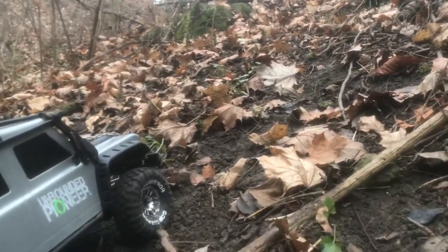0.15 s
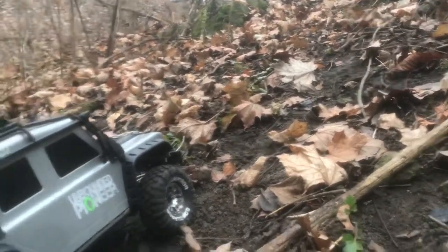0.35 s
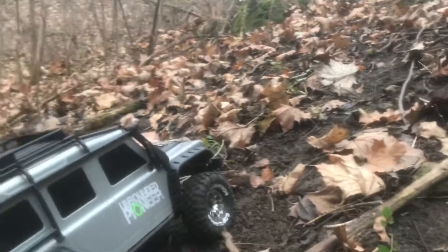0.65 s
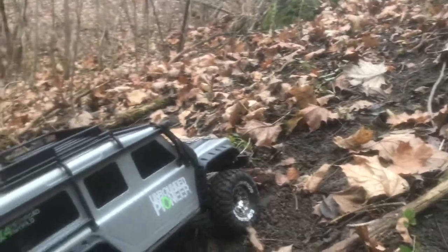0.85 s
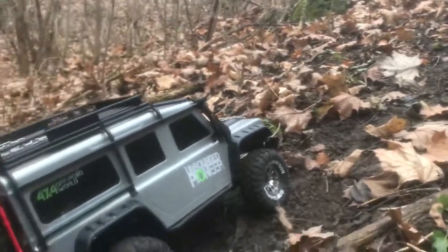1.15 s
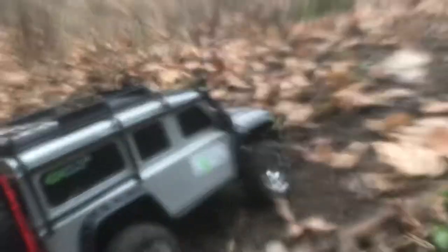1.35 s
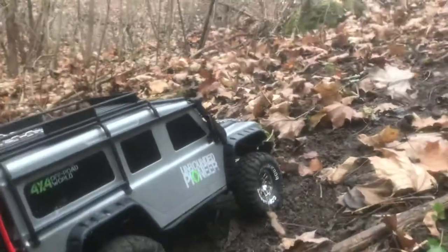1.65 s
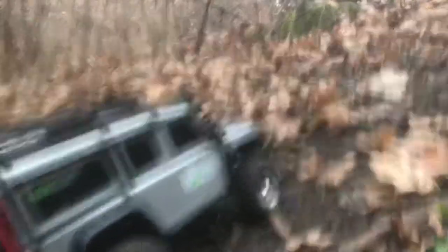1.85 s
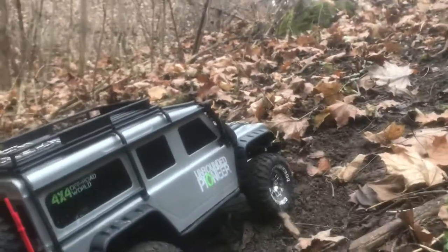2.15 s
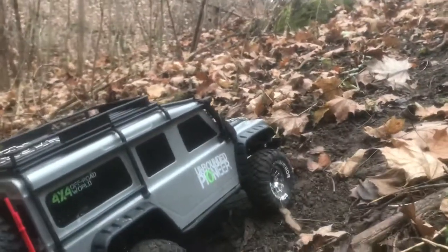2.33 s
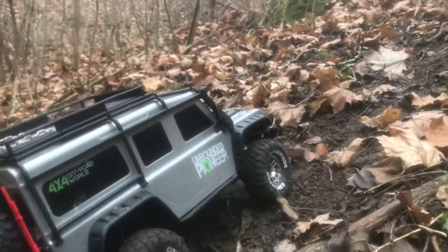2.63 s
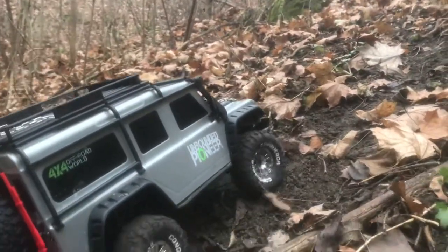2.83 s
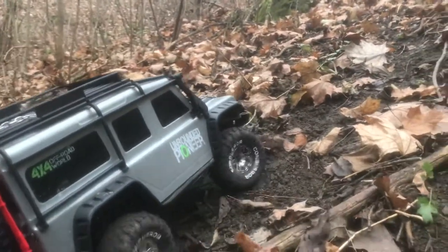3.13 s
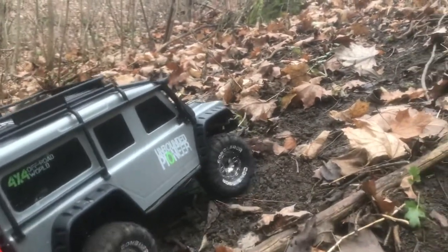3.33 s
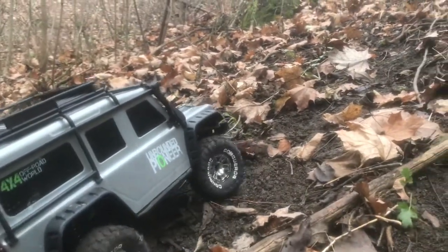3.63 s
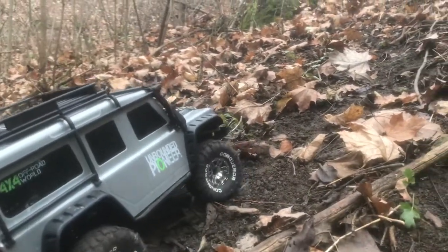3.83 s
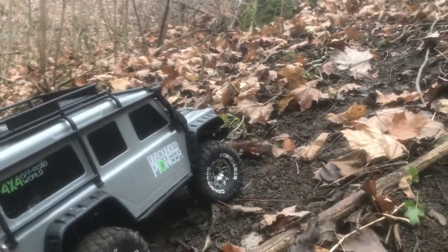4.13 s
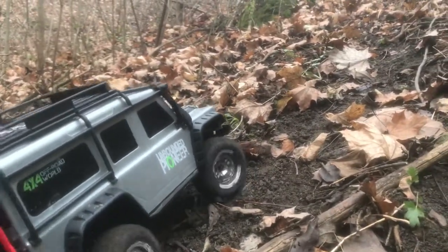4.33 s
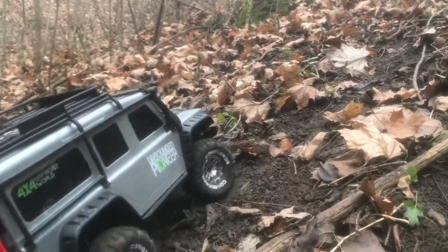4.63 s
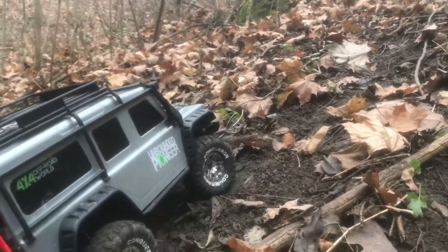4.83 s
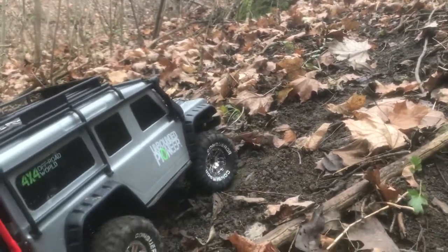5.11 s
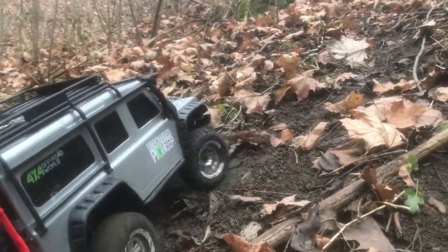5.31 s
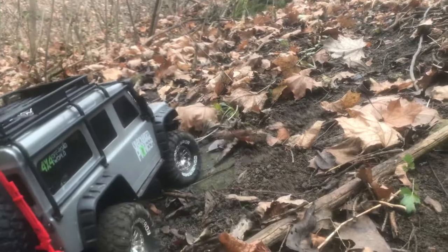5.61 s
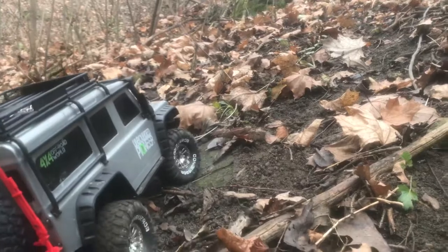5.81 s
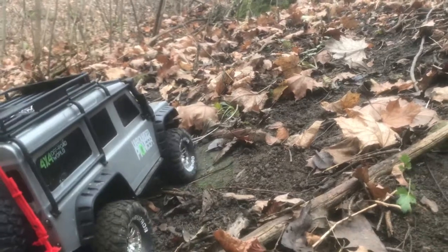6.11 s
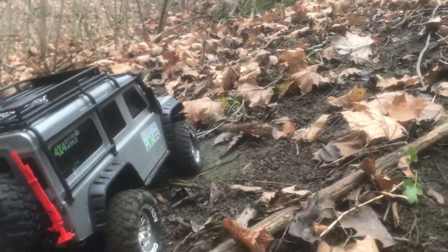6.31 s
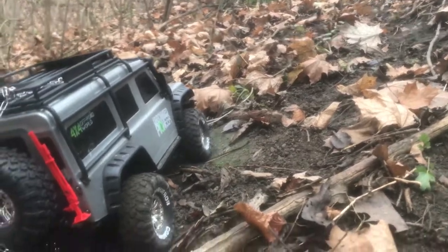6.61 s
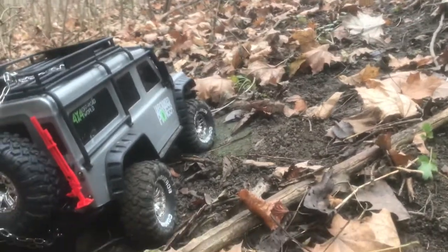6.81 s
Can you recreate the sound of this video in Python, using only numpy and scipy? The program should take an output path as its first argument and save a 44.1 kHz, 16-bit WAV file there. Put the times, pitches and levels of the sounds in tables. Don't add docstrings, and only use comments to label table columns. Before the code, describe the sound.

Close outdoor sound on a woodland floor, with faint low traffic far behind. From about 0.2 s a small electric model truck starts crawling: a low, rapid buzzing hum near 80 pulses a second, gears slapping and rattling in a plastic shell, hissy pinion whine, dry leaves crunching. At 1.32 s a twig snaps very loudly, with splinters and a dull thud; further knocks come around 1.8 to 1.9 s. A brief high servo whine sounds at 2.6 to 2.9 s as the tyres lose grip and scrabble unevenly, cracking stalks. The steady drive stops near 3.8 s. Short gritty wheel-spin bursts follow at 4.3 to 4.6 s and 5.2 to 5.5 s, with sharp cracks. A hard crack and woody knock land at 5.72 s, then a slowing servo whirr. The rest is quiet: small knocks, sparse ticks, and a rising-and-falling servo turn at 6.5 to 6.9 s.

```python
import sys
import numpy as np
from scipy import signal
from scipy.fft import rfft, irfft
from scipy.io import wavfile

SR = 44100
rng = np.random.default_rng(int(sys.argv[2]) if len(sys.argv) > 2 else 0)


def convert_level_to_amplitude(level_db):
    exponent = np.asarray(level_db, float) / 20
    return 10 ** exponent


def unload_audio(sound):
    columns = np.transpose(np.atleast_2d(sound))
    steps = np.round(np.clip(columns, -1, 1) * 32767)
    wavfile.write(sys.argv[1], SR, steps.astype(np.int16))


N = 306923
TIME_S = np.arange(N) / SR
CHOP_HZ = 78.9
GRIP_ENDS_S, CRAWL_ENDS_S = 2.76, 4.0
GRIPPING, CRAWLING = TIME_S < GRIP_ENDS_S, TIME_S < CRAWL_ENDS_S


def rms_one(x):
    return x / np.sqrt(np.mean(x ** 2) + 1e-20)


def in_time(rows, outside=None):
    s, *columns = np.transpose(rows)
    return [np.interp(TIME_S, s, c, left=outside, right=outside) for c in columns]


def drift(rate):
    r = np.exp(-40 * np.pi * rate / SR)
    noise = rng.standard_normal(N // 20 + 2002)
    slow = signal.lfilter([1], [1, -2 * r, r * r], noise)[2000:]
    return np.interp(np.arange(N) / 20, np.arange(len(slow)), rms_one(slow))


def colour(x, spectrum):
    hz, db = np.transpose(spectrum)
    grid = np.maximum(np.arange(8193) * SR / 16384, 1)
    log_gain = np.interp(np.log(grid), np.log(hz), db, left=-90, right=-90) * np.log(10) / 20
    cepstrum = irfft(log_gain)
    cepstrum[1:8192] *= 2
    cepstrum[8193:] = 0
    response = irfft(np.exp(rfft(cepstrum)))
    return rms_one(signal.fftconvolve(x, response)[:N])


def resonate(x, modes):
    out = 0
    for k, (hz, width, db) in enumerate(modes):
        r = np.exp(-np.pi * width / SR)
        a = [1, -2 * r * np.cos(2 * np.pi * hz / SR), r * r]
        b = np.array([1, 0, -1]) * (1 - r * r) / 2
        out = out + (-1) ** k * convert_level_to_amplitude(db) * signal.lfilter(b, a, x + 1e-18)
    return rms_one(out)


def grains(per_s, spread_db, bed):
    sizes = convert_level_to_amplitude(spread_db * np.minimum(rng.exponential(1, N), 4)) * rng.choice([-1, 1], N)
    clicks = sizes * (rng.random(N) < per_s / SR)
    return rms_one(clicks) + bed * rng.standard_normal(N)


def burst(noise, low_hz, high_hz, t60, rise_s=.00012):
    t = np.arange(len(noise)) / SR
    band = signal.butter(2, np.clip([low_hz, high_hz], 50, 17000), "band", fs=SR, output="sos")
    puff = signal.sosfilt(band, noise * convert_level_to_amplitude(-60 * t / t60) * (1 - np.exp(-t / rise_s)))
    return puff / np.abs(puff).max()


def add(out, s, sound):
    at = int(s * SR)
    out[at:at + len(sound)] += sound[:N - at]


def swells(rows, rise_db_per_s, fall_db_per_s):
    s, length, db = np.transpose(rows)[:, :, None]
    t = np.arange(0, N, 32) / SR
    early_s, late_s = np.maximum(s - t, 0), np.maximum(t - s - length, 0)
    shape_db = db - rise_db_per_s * early_s - fall_db_per_s * late_s
    return np.interp(TIME_S, t, np.sum(convert_level_to_amplitude(shape_db) ** 2, axis=0))


# (start t/s, length t/s, depth level/dB)
BASS_SAGS = [
    (1.435, 0.14, -21.5),
    (1.975, 0.08, -8),
]


def bass_sag():
    sag_db, edge_s = 0, .11
    for s, length, db in BASS_SAGS:
        inside_s = np.minimum(TIME_S - s, s + length - TIME_S)
        sag_db = sag_db + db * np.clip(inside_s / edge_s + 1, 0, 1)
    return convert_level_to_amplitude(sag_db)


# (f/Hz, level/dB per Hz)
RUMBLE_COLOUR = [(12, -62.5), (20, -49.5), (27, -35.5), (36, -11.5), (59, 3), (80, 3.5), (92, -10.5),
                 (129, -14), (191, -36.5), (220, -31), (290, -53), (480, -120)]
# (f/Hz, level/dB per Hz)
AIR = [(100, -30), (160, -8), (250, -17), (470, -23), (950, -15), (1500, -20), (2100, -33), (5000, -38),
       (13900, -43), (16400, -45)]


def woodland():
    rumble_gain = convert_level_to_amplitude(-45.5 - 0.13 * TIME_S) * bass_sag()
    rumble = rumble_gain * colour(rng.standard_normal(N), RUMBLE_COLOUR)
    air = convert_level_to_amplitude(-64.5 + drift(5.4)) * colour(rng.standard_normal(N), AIR)
    return rumble + air


# (t/s, gear tooth rate f/Hz, level/dB)
SERVO = [
    [(2.63, 1000, -68), (2.7, 1000, -60), (2.86, 1018, -59), (2.9, 1020, -67)],
    [(5.77, 704, -84), (5.8, 755, -67), (5.88, 600, -75), (5.93, 560, -79), (6.2, 500, -83),
     (6.3, 500, -92)],
    [(6.495, 480, -75), (6.52, 610, -67), (6.556, 786, -65), (6.586, 794, -63), (6.64, 730, -67),
     (6.695, 700, -65), (6.77, 590, -67), (6.9, 572, -79), (6.925, 535, -85)],
]
# (least noise share 0-1, lower case ring level/dB)
SERVO_MOVES = [
    (.78, -20),
    (.75, -3),
    (.5, -14),
]
# (t/s, f/Hz, level/dB)
SERVO_GLIDE = [(6.58, 5600, -84), (6.6, 5400, -73), (6.635, 4950, -72), (6.68, 4550, -74),
               (6.71, 4350, -86)]
# (f/Hz, width f/Hz, level/dB)
SERVO_CASE = [(12120, 260, 0), (11500, 500, -9), (12750, 450, -9), (14300, 500, -17)]
# (f/Hz, width f/Hz, level/dB)
SERVO_LOWER = [(9050, 340, -1), (9540, 470, -6), (5000, 800, -15.5)]


def servo():
    out, noise, wobble = 0, rng.standard_normal(N), drift(40.0)
    unsteady = 1 + .004 * wobble
    tooth_hz = in_time(sum(SERVO, []))[0]
    teeth = (2 * np.pi * (np.cumsum(tooth_hz * unsteady) / SR % 1)).astype(np.float32)
    ticks = rms_one(sum(np.cos(k * teeth) * (k * tooth_hz < 16000) for k in range(5, 30)))
    blurred_hz, clear_hz = 500, 900
    for rows, (least, lower_db) in zip(SERVO, SERVO_MOVES):
        level_db = in_time(rows, outside=-140)[1]
        share = np.clip((clear_hz - tooth_hz) / (clear_hz - blurred_hz), least, .95) ** 1.5
        drive = (1 - share) * ticks + share * noise
        ring = resonate(drive, SERVO_CASE) + convert_level_to_amplitude(lower_db) * resonate(drive, SERVO_LOWER)
        out = out + convert_level_to_amplitude(level_db + 4.0) * ring
    glide_hz, glide_db = in_time(SERVO_GLIDE, outside=-140)
    whistle = np.sin(2 * np.pi * np.cumsum(glide_hz * unsteady) / SR)
    return out + convert_level_to_amplitude(glide_db + 3 * wobble) * whistle


# (t/s, peak level/dB, f/Hz, t60 t/s)
THUDS = [(1.3215, -4.5, 594, 0.015), (1.3228, -28.5, 1392, 0.078), (1.321, -33, 1095, 0.059),
         (1.3207, -20, 1625, 0.017), (1.324, -32, 3000, .015), (1.327, -39, 1495, .035),
         (1.8291, -13, 717, 0.016), (1.9308, -14.5, 740, 0.011), (1.3234, -5.5, 298, 0.012),
         (1.324, -6, 215, 0.016), (1.3544, -6.5, 630, 0.0045), (1.83, -29, 330, 0.025),
         (1.835, -29, 170, 0.032), (6.478, -46, 2100, 0.029), (3.4, -36.5, 137, .15),
         (3.529, -34, 140, .12), (4.139, -39.5, 246, 0.092), (6.49, -39, 3240, 0.026),
         (6.49, -40, 93, 0.072), (1.356, -17, 196, 0.03), (5.722, -39, 792, 0.12), (5.757, -43, 167, 0.11),
         (5.668, -46, 490, 0.044), (5.928, -47, 453, 0.049), (6.659, -38, 145, 0.047),
         (6.661, -44.5, 455, 0.068)]


def thuds():
    out, t = np.zeros(N), np.arange(4000) / SR
    onset = 1 - np.exp(-t / 0.00052)
    for s, db, hz, t60 in THUDS:
        add(out, s, -convert_level_to_amplitude(db - 60 * t / t60) * np.sin(2 * np.pi * hz * t) * onset)
    return out


# (t/s, peak level/dB, centre f/Hz, ring t60 t/s)
KNOCKS = [(0.204, -37, 720, 0.044), (1.172, -44, 690, 0.032), (1.223, -51, 700, 0.025),
          (1.503, -35, 700, 0.02), (1.829, -25.5, 1260, 0.017), (3.642, -58, 800, .02),
          (1.832, -25, 750, 0.034), (1.881, -33, 900, 0.034), (1.933, -26, 690, 0.041),
          (2.736, -31.5, 2020, 0.021), (2.879, -28.5, 500, 0.022), (3.059, -32, 880, 0.024),
          (3.366, -32, 610, 0.059), (3.609, -26, 517, 0.043), (3.714, -28.5, 705, 0.024),
          (4.142, -39.5, 1500, 0.019), (4.284, -31, 1010, 0.033), (4.738, -41.5, 1140, 0.031),
          (4.995, -45, 1830, 0.024), (5.098, -32, 1440, 0.04), (5.188, -38, 794, 0.031),
          (5.47, -24.5, 2370, 0.03), (5.722, -22, 1546, 0.038), (5.729, -23.5, 1706, 0.062),
          (5.744, -27.5, 1400, 0.066), (5.733, -29.5, 1010, 0.065), (5.752, -28.5, 2390, 0.024),
          (5.834, -43.5, 1447, 0.12), (6.021, -39, 1085, 0.044), (6.493, -38.5, 1028, 0.063),
          (6.659, -32, 1370, 0.036), (6.689, -49, 1710, .025), (6.766, -49, 1500, .025),
          (6.914, -52, 1510, 0.026), (6.55, -50, 700, 0.025)]


def knocks():
    out, noise, t = np.zeros(N), rng.standard_normal((len(KNOCKS), 3000)), np.arange(3000) / SR
    for (s, db, hz, t60), a in zip(KNOCKS, noise):
        ring = 0.54 * np.sin(2 * np.pi * hz * t) * convert_level_to_amplitude(-60 * t / t60)
        sound = burst(a, hz / 2.26, hz * 1.88, t60) + ring
        add(out, s, convert_level_to_amplitude(db - 1.0) * sound / np.abs(sound).max())
    return out


# (t/s, peak level/dB, centre f/Hz, bright part level/dB)
CRACKS = [(1.3208, -16, 8640, 8), (1.3662, -28, 2650, -6), (1.8295, -31, 2440, 11), (1.8315, -28, 3440, -3),
          (1.9303, -32, 1920, 5), (1.831, -26, 6300, -6), (2.825, -15, 5300, 23), (3.1688, -21, 2680, 26),
          (3.391, -23.5, 2560, 17), (3.6026, -20.5, 4050, 7.5), (3.6197, -21.5, 5600, 5),
          (3.716, -23.5, 4000, 1), (3.714, -26, 1700, 7), (4.3112, -26, 2670, -1), (4.3203, -17.5, 3800, 7),
          (4.3394, -20, 3070, 13), (4.4432, -14, 4400, 6), (4.4583, -14, 5760, 18),
          (5.0769, -28.5, 2860, 12), (5.1007, -32, 2880, -10), (5.1194, -29, 4050, 20),
          (5.2101, -22, 4200, 7), (5.3444, -15, 3860, 14), (5.7208, -15, 8360, 11),
          (5.7308, -12.5, 2680, 17), (6.02, -41, 2560, 20), (6.4894, -28.5, 2350, 12),
          (6.6588, -48, 2480, 10)]
# (t/s, peak level/dB, centre f/Hz)
TICKS = [(0.204, -31, 2860), (1.641, -29, 3970), (1.954, -30.5, 5700), (2.166, -33, 8950),
         (2.283, -27, 7940), (2.878, -25, 3600), (3.034, -21, 5600), (3.098, -27.5, 2700),
         (3.452, -27, 3930), (3.8304, -40, 5400), (4.1438, -46, 2660), (4.2857, -29, 2620),
         (4.4218, -24, 4110), (4.469, -22.5, 4600), (4.555, -19.5, 4040), (4.59, -34, 2680),
         (4.663, -37, 3180), (4.7396, -46, 4220), (5.0603, -44, 4060), (5.143, -46, 4400),
         (5.513, -37, 2500), (0.743, -33, 11500), (1.075, -38, 9000), (2.52, -25.5, 4000),
         (2.405, -31, 4600), (2.765, -34, 3900), (5.189, -44, 4150), (5.471, -33, 2520), (5.525, -25, 4250),
         (5.5615, -30, 5700), (5.5817, -26.5, 6000), (5.6582, -39.5, 6540), (5.745, -26, 2560),
         (5.7534, -33, 2520), (5.836, -37.5, 3370), (6.122, -42, 4250), (6.8586, -46, 9640),
         (6.867, -47, 4100), (6.399, -59, 5000), (6.503, -50, 4600), (6.552, -54, 4750), (6.689, -49, 5600),
         (6.797, -54, 4500), (2.993, -36, 2610), (3.017, -28, 3740), (3.4254, -32, 4320),
         (3.46, -33.5, 1810), (3.515, -30, 4060), (3.545, -34, 2660), (3.5818, -31, 3590),
         (3.609, -25.5, 2720), (3.6537, -30, 3940), (3.665, -34, 2050), (4.328, -28, 2900),
         (4.366, -33, 5870), (5.239, -23.5, 2620), (5.2572, -24, 2570), (5.291, -33, 2940),
         (5.3105, -29, 4000), (5.335, -27, 5500), (5.372, -27, 2680), (5.3993, -31, 2860),
         (5.4173, -34, 4300), (5.749, -32, 6000), (6.064, -56, 2400), (6.108, -44.5, 2450),
         (6.365, -58, 9200)]


def cracks():
    breaks = CRACKS + [(*row, 6) for row in TICKS]
    out, noise = np.zeros(N), rng.standard_normal((len(breaks), 2, 1500))
    rise_s = .0005
    for (s, db, hz, bright_db), (a, b) in zip(breaks, noise):
        t60 = .0042 * convert_level_to_amplitude(-.3 * db)
        rip = convert_level_to_amplitude(bright_db - 4.0) * burst(a, 2200, 16000, t60, rise_s)
        sound = rip + burst(b, hz / 1.13, hz * 1.13, 1.9 * t60, rise_s)
        add(out, s + .0004, convert_level_to_amplitude(db - 6.0) * sound / np.abs(sound).max())
    return out


# (t/s, peak level/dB, top ring level/dB)
SNAPS = [
    (1.3233, -4, -4),
    (1.3332, -12, -2.5),
    (1.3566, -9.5, -10),
    (1.3662, -21, -13),
]
# (f/Hz, width f/Hz, level/dB)
SNAP_RING = [(3000, 500, -7), (4200, 940, -3.5), (6140, 1500, 1), (8460, 1600, -4)]


def snaps():
    out, noise, t = np.zeros(N), rng.standard_normal((len(SNAPS), 600)), np.arange(600) / SR
    for (s, db, top_db), a in zip(SNAPS, noise):
        step = (t == 0) + convert_level_to_amplitude(-18 - 60 * t / .004) * a
        sound = resonate(step, SNAP_RING + [(12900, 2000, top_db)])
        add(out, s, convert_level_to_amplitude(db) * sound / np.abs(sound).max())
    return out


# (t/s, torque hum level/dB, pinion mesh level/dB)
HUM = [(0.05, -54, -83), (0.17, -54.5, -60), (0.23, -47, -54.5), (0.36, -47, -48), (0.46, -46, -50),
       (0.57, -47.5, -52), (0.63, -46.5, -53), (0.85, -48.5, -53), (1.35, -45.5, -64), (1.43, -48.5, -69),
       (2.0, -50.5, -53), (2.36, -44, -70), (2.72, -48.5, -59), (2.8, -55, -65), (3.0, -52.5, -65),
       (3.58, -50.5, -59), (3.74, -47, -62), (3.8, -67, -86)]
# (multiple, level/dB under the third)
HUM_ORDERS = [(2, -22.5), (2.5, -25), (3.5, -15.5), (4, -26.5), (5, -8.5), (5.5, -12.5), (6, -16), (7, -14),
              (8, -12), (9, -25.5), (10, -17.5), (11, -22), (13, -22.5), (14, -22), (15, -35), (17, -27.5),
              (19, -17.5)]


def motor_hum(turn):
    third_db = in_time(HUM, outside=-140)[0]
    first = convert_level_to_amplitude(-40.5 + 0.54 * (third_db + 44.0)) * bass_sag()
    stutter_db = 5 * drift(14.0) * (TIME_S > GRIP_ENDS_S)
    sway = [drift(1.7) for _ in range(4)]
    wavering = 0
    for j, (k, db) in enumerate(HUM_ORDERS):
        wavering = wavering + convert_level_to_amplitude(db + 1.4 * sway[j % 4]) * np.cos(k * turn)
    upper = convert_level_to_amplitude(third_db + 1.2 + stutter_db) * (np.cos(3 * turn) + wavering)
    return -np.sqrt(2) * (first * np.cos(turn) + upper)


# (t/s, growl level/dB)
LOAD = [(0.0, -45), (0.07, -53.5), (0.16, -51), (0.22, -47), (1.45, -44.5), (2.5, -43), (2.72, -42),
        (2.8, -46), (3.05, -42.5), (3.27, -44), (3.735, -43), (3.8, -60.5), (3.97, -67.5), (4.64, -56.5),
        (5.04, -74.5), (5.7, -58), (6.3, -64.5), (6.96, -67)]
# (start t/s, length t/s, growl level/dB)
SLIPS = [(4.18, 0.08, -45), (4.26, 0.036, -44), (4.3, 0.058, -32.5), (4.4, 0.047, -33), (4.52, 0.026, -54),
         (4.555, 0.045, -39), (5.13, .05, -48), (5.19, .015, -45.5), (5.215, 0.14, -33.5),
         (5.37, 0.15, -38.5), (5.735, 0.02, -69)]
# (start t/s, length t/s, growl level/dB)
JERKS = [
    (4.103, .07, -56),
    (5.06, 0.057, -45.5),
]
# (start t/s, length t/s, crunch level/dB)
BITES = [(.23, 0.074, -62), (.33, 0.082, -53), (.44, 0.11, -67), (.495, .008, -57), (.605, 0.058, -58),
         (.7, 0.17, -57), (.92, 0.14, -64), (1.065, 0.041, -53), (1.17, .06, -73), (1.25, 0.37, -60),
         (2.2, 0.079, -53.5), (2.32, 0.15, -53.5), (2.53, 0.18, -53.5), (2.885, 0.011, -48.5),
         (3.03, 0.03, -55), (3.09, .03, -56), (3.14, 0.0086, -51.5), (3.21, 0.034, -62),
         (3.36, 0.23, -58.5), (3.79, 0.1, -66), (4.06, 0.019, -76), (4.34, 0.0083, -45.5),
         (4.425, 0.01, -48.5), (4.555, 0.0067, -53.5), (4.7, 0.063, -68.5), (5.2, 0.068, -54),
         (5.43, 0.026, -53.5), (5.52, 0.064, -60), (5.725, 0.0047, -55), (5.84, 0.059, -73),
         (5.96, 0.25, -72.5), (6.5, 0.2, -69.5), (6.76, .04, -72)]


def wheel_work():
    load_db = in_time(LOAD)[0]
    slips = swells(SLIPS, 406, 297.5) + swells(JERKS, 3000, 297.5)
    bites = swells(BITES, 309, 213)
    growl = convert_level_to_amplitude(load_db) ** 2 + slips
    slack_db = np.minimum(60.0 * (TIME_S - .2), 0)
    rattle = convert_level_to_amplitude(load_db + slack_db - 11) ** 2 + convert_level_to_amplitude(-10) ** 2 * slips + convert_level_to_amplitude(3) ** 2 * bites
    crunch = convert_level_to_amplitude(-68 + 0.65 * (load_db + 50.0)) ** 2 + convert_level_to_amplitude(-17) ** 2 * slips + bites
    return np.sqrt([growl, rattle, crunch])


# (t/s, share 0-1)
SLACK = [(.2, .75), (.5, .6), (.7, .95), (.9, .85), (1.1, .45), (2.2, .5), (2.5, .35), (2.76, .5)]


def gear_slap(turn):
    depth = np.where(GRIPPING, 0.86 * in_time(SLACK)[0], 0.35)
    depth = np.clip(depth, 0, 1) * (TIME_S < HUM[-1][0])
    pulse = .5 + .5 * np.cos(turn - .3 + .25 * drift(20.0))
    pulse = pulse * convert_level_to_amplitude(1.3 * drift(40.0)) * (1 + .45 * np.cos(3 * turn))
    return 1 - depth + depth * 3.33 * pulse


def ahead(slap, share):
    return np.roll(slap, -int(share * SR / CHOP_HZ))


def housing_knock(turn):
    cycles = turn / (2 * np.pi) - .29 + .015 * drift(30.0)
    sizes_db = 1.2 * rng.standard_normal(600)
    return rms_one(convert_level_to_amplitude(sizes_db[cycles.astype(int) % 600] - 26 * (cycles % 1)))


# (f/Hz, width f/Hz, level/dB)
FLOOR_RING = [(1120, 350, 1), (1500, 300, 2), (2140, 240, -8), (2660, 300, -2)]
# (t/s, level/dB over the growl)
FLOOR_KNOCK = [(.2, -13), (1.2, -14), (2.0, -12), (2.15, -9), (2.55, -9), (2.76, -12)]


def shell_floor(knock):
    tap = rms_one(np.maximum(np.diff(knock, prepend=0), 0))
    floor = resonate(rng.standard_normal(N) * knock + .9 * tap, FLOOR_RING)
    return convert_level_to_amplitude(in_time(FLOOR_KNOCK)[0]) * GRIPPING * floor


# (f/Hz, level/dB per Hz)
GROWL = [(55, -4), (90, -2.5), (175, -15), (260, -6.5), (400, -8.5), (640, -10.5), (720, -17),
         (1100, -27.5), (2000, -46)]
# (f/Hz, level/dB per Hz)
GROWL_UPPER = [(500, -23), (800, 0), (1500, -5.5), (2500, -9), (3300, -12), (4500, -30)]
# (f/Hz, level/dB per Hz)
GRIND = [(53, -9), (90, 4), (124, -3), (166, -7), (328, -3), (526, -9), (1160, -10.5), (1650, -19.5),
         (1950, -21), (2500, -42), (3250, -25), (5500, -120)]


def growl(lumps, slap, knocked):
    rasp = np.where(GRIPPING, rng.standard_normal(N) * knocked, rms_one(lumps))
    loaded = colour(lumps * slap ** .3, GROWL) + convert_level_to_amplitude(-10) * colour(rasp, GROWL_UPPER)
    return np.where(CRAWLING, loaded, colour(lumps, GRIND))


# (f/Hz, width f/Hz, level/dB)
SHELL = [(1526, 52, 5), (2100, 100, 2), (2680, 460, 4), (3980, 800, 6), (4520, 370, -0.5), (5600, 330, -26),
         (7150, 690, -6.5)]


def gear_rattle(clumps, slap, knocked):
    chatter = grains(6000, 4.0, bed=0.85) * convert_level_to_amplitude(2.5 * clumps)
    low = resonate(chatter * knocked, SHELL[:3])
    high = resonate(chatter * ahead(slap, .2) ** 1.55, SHELL[3:])
    buzz = rms_one(convert_level_to_amplitude(-6.0) * low + high)
    pings = 0
    for hz, width, db in SHELL:
        pings = pings + convert_level_to_amplitude(db) * resonate(grains(70, 5.5, bed=0.075), [(hz, 0.6 * width, 0)])
    return buzz + np.where(CRAWLING, .15, .9) * rms_one(pings)


# (f/Hz, width f/Hz, level/dB)
PINION = [(3850, 330, 2), (4250, 250, -2.5), (5600, 210, 3.5), (4960, 590, -13.5), (8920, 200, -9),
          (12000, 360, -8)]


def pinion_whine(turn, slap):
    wobbling = (TIME_S > 2.15) * GRIPPING
    wobble_db = 3.5 * np.cos(turn / 3 + 1.4) * wobbling
    mesh = rng.standard_normal(N) * ahead(slap, .12) ** 1.33 * convert_level_to_amplitude(wobble_db)
    whine_db = in_time(HUM, outside=-120)[1]
    return convert_level_to_amplitude(whine_db - 7.1) * resonate(mesh, PINION)


# (f/Hz, level/dB per Hz)
CLACK = [(1500, -34), (4000, -10), (5700, -4), (7500, -12.5), (8800, -2.5), (10400, -25), (11800, -3),
         (15700, -20.5)]


def backlash(turn):
    cycles = turn / (2 * np.pi) + .25 + .13 * drift(1.2) + .03 * drift(30.0)
    sizes_db = 3 * rng.standard_normal(600)
    ticks = convert_level_to_amplitude(sizes_db[cycles.astype(int) % 600] - 24 * (cycles % 1)) * rng.standard_normal(N)
    return convert_level_to_amplitude(-5) * colour(ticks, CLACK)


# (f/Hz, level/dB per Hz)
CRUNCH = [(1060, -4), (1800, -3.5), (1950, -13.5), (2630, -3.5), (3390, -6), (4260, -4.5), (4920, -7),
          (5900, -3.5), (7600, -13), (8330, -6.5), (10300, -12.5), (12500, -7.5), (15700, -15)]


def leaf_crunch(turn, clumps, slap):
    patches = convert_level_to_amplitude(2.2 * drift(25.0))
    litter = grains(3000 * convert_level_to_amplitude(2.5 * clumps), 3.3, bed=.8)
    leaves = colour(litter * patches * slap ** .35, CRUNCH)
    gripped = convert_level_to_amplitude(-5.5) * leaves + convert_level_to_amplitude(-2.5) * in_time(SLACK)[0] * backlash(turn)
    return np.where(GRIPPING, gripped, leaves)


def wheels(turn):
    growl_gain, rattle_gain, crunch_gain = wheel_work()
    slap = gear_slap(turn)
    clumps = drift(60.0) * np.where(GRIPPING, .25, np.where(CRAWLING, .6, .9))
    lumps = grains(400 * convert_level_to_amplitude(2.7 * clumps), 2.6, bed=1.0) * convert_level_to_amplitude(1.27 * drift(11.0))
    knock = housing_knock(turn)
    knocked = np.where(GRIPPING, .22 + knock, 1)
    low = growl_gain * (growl(lumps, slap, knocked) + shell_floor(knock))
    rattle = convert_level_to_amplitude(-3.5) * rattle_gain * gear_rattle(clumps, slap, knocked)
    crunch = convert_level_to_amplitude(5.5) * crunch_gain * leaf_crunch(turn, clumps, slap)
    return low + rattle + pinion_whine(turn, slap) + crunch


def scene():
    turn = 2 * np.pi * np.cumsum(CHOP_HZ * (1 + 0.00183 * drift(1.84))) / SR
    scrabbling = np.clip(8 * (TIME_S - GRIP_ENDS_S), 0, 1)
    turn = turn + .55 * scrabbling * drift(7.0)
    background = woodland() + servo()
    twigs = thuds() + knocks() + cracks() + snaps()
    return (background + twigs + motor_hum(turn) + wheels(turn))[None]


def band_limit(x):
    return signal.sosfilt(signal.butter(12, 17080, fs=SR, output="sos"), x)


def record(dry):
    bass_cut = signal.sosfilt(signal.butter(3, 38.0, "high", fs=SR, output="sos"), dry)
    mix = signal.sosfilt(signal.cheby2(12, 60, 16600, fs=SR, output="sos"), bass_cut)
    return band_limit(mix)


dry = scene()
out = record(dry)
unload_audio(out)
```